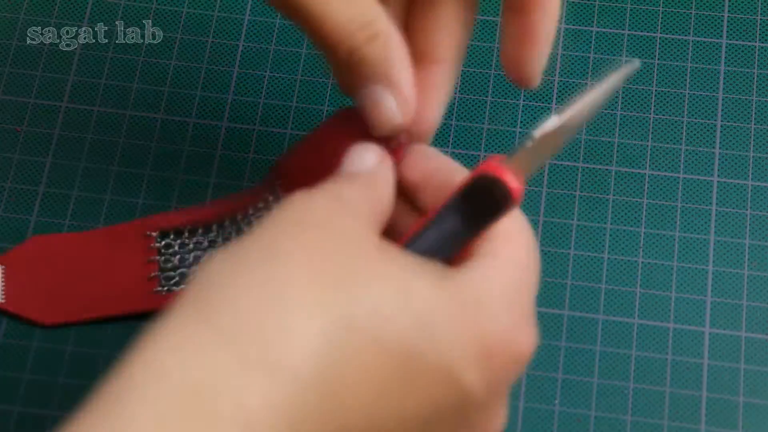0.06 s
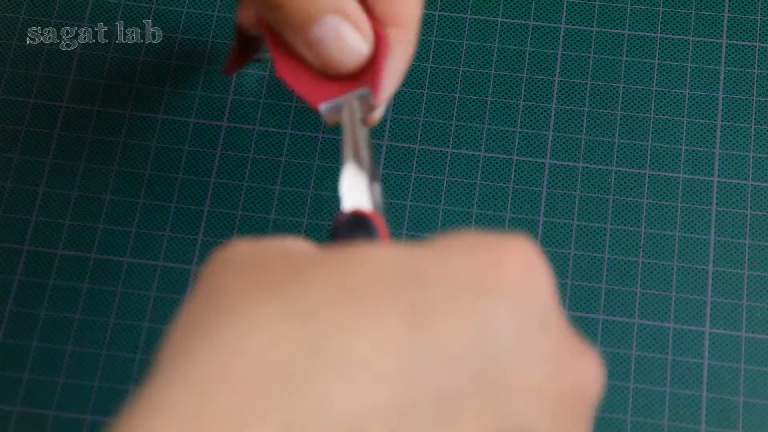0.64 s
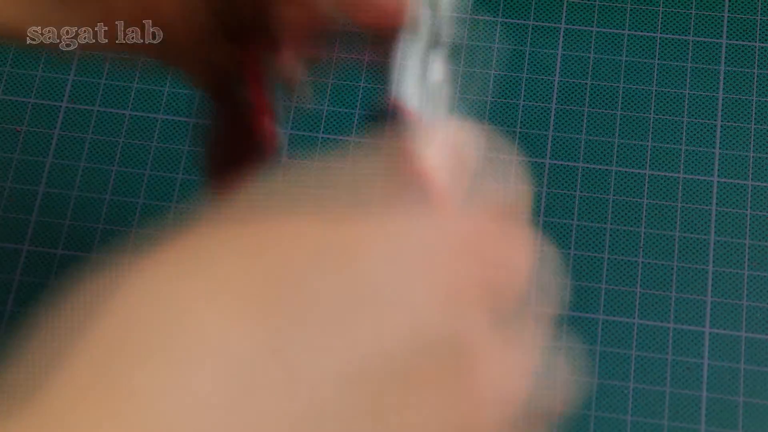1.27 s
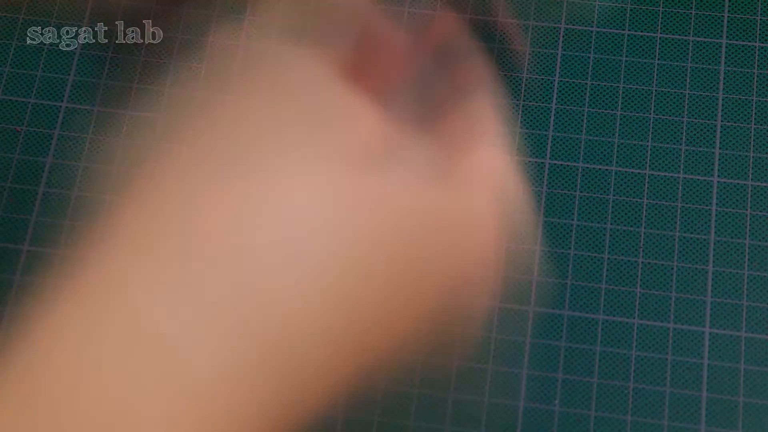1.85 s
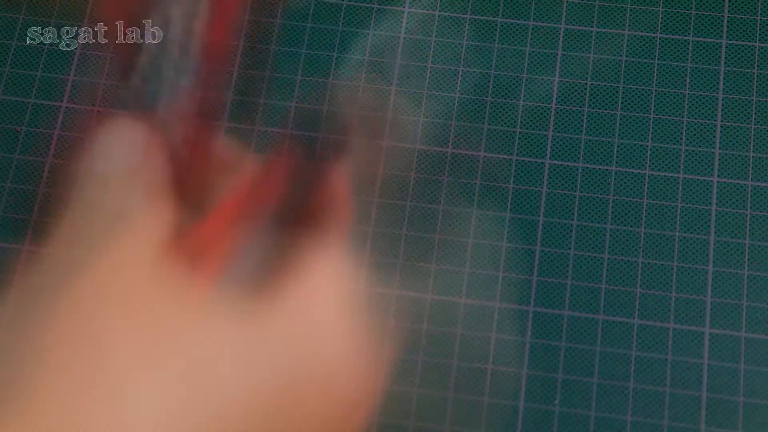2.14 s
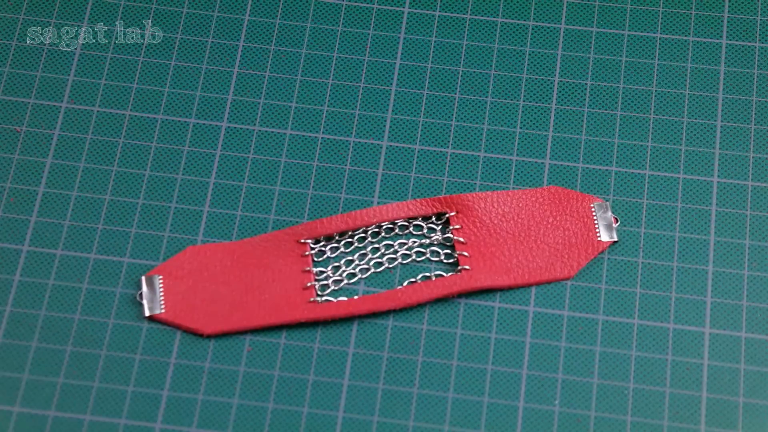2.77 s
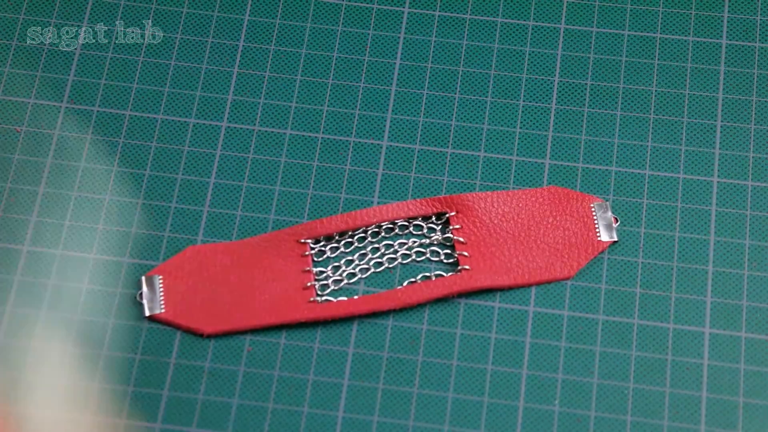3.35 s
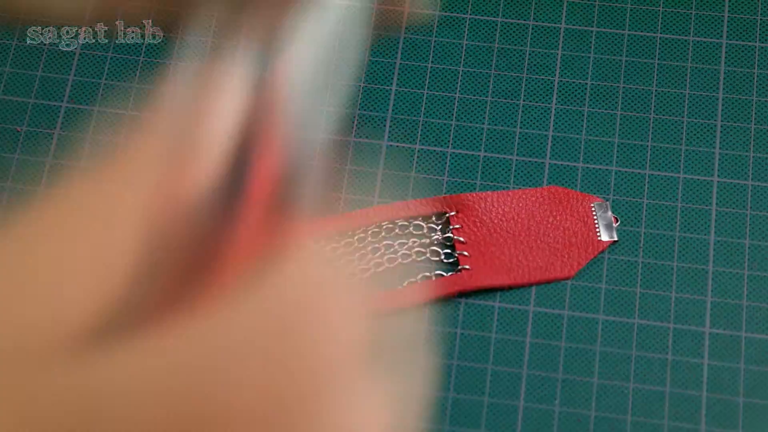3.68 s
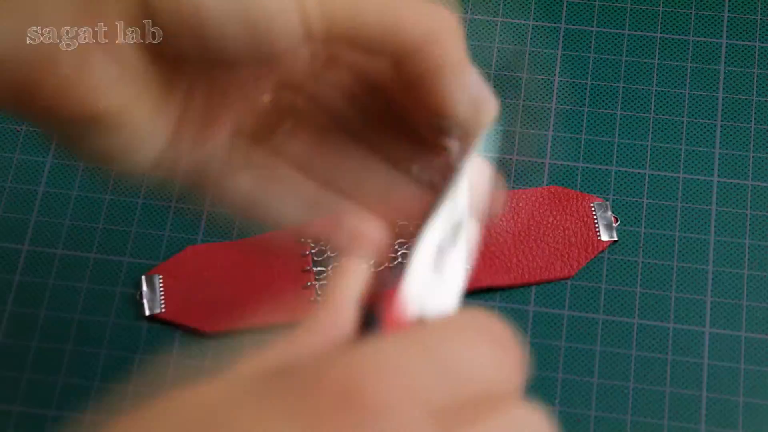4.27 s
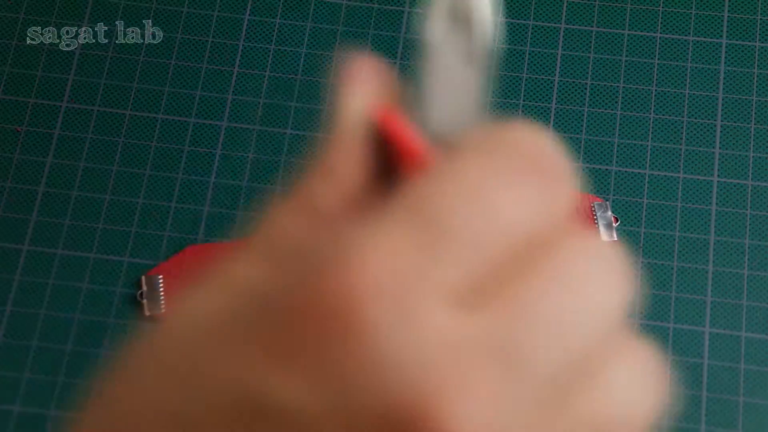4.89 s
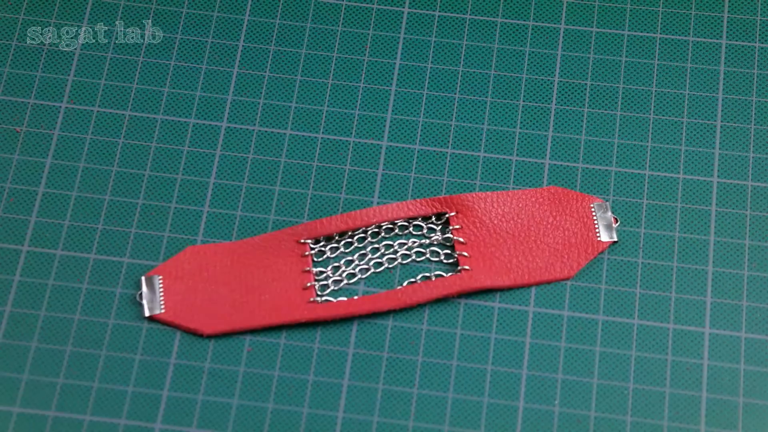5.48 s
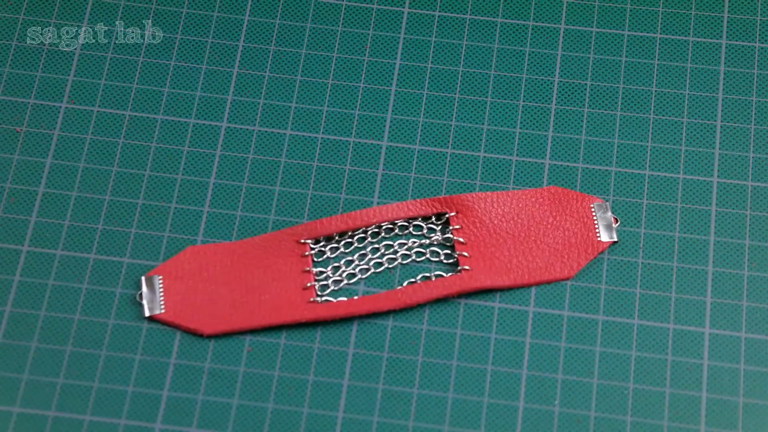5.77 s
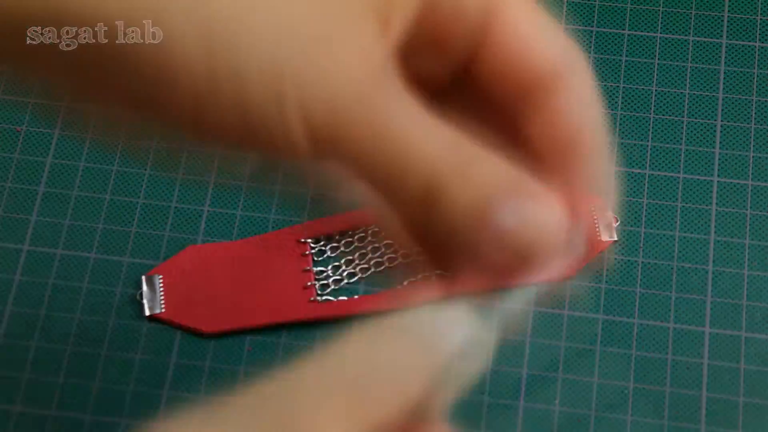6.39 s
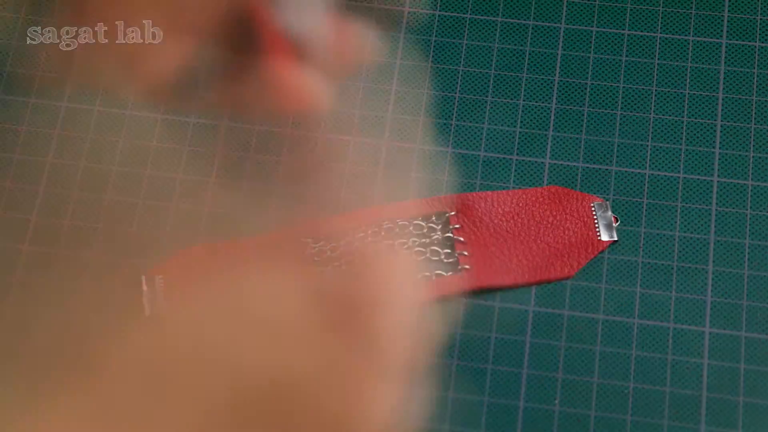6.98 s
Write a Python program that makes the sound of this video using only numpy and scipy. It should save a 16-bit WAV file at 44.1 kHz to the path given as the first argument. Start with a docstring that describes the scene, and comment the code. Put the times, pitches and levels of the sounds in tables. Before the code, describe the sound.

Close handling of a leather and chain bracelet: soft rubbing, a clasp clinking down, tiny squeaks and two sharp clicks of pliers.

```python
"""Bracelet work on a cutting mat

A leather and chain bracelet is handled up close in a small, dead room. Fingers and leather rub in
short, grainy strokes, a hand bumps the table, and a clasp drops on the mat with a brief ring.
Steel pliers squeak as they stick and slip, and twice snap shut.
Behind it all sit room air, a thin electrical whine and a faint wavering drone."""
import sys
import numpy as np
from scipy import signal
from scipy.fft import rfft, irfft, next_fast_len
from scipy.io import wavfile

SR = 44100
rng = np.random.default_rng(int(sys.argv[2]) if len(sys.argv) > 2 else 0)


def to_wav(s):
    """Save 16-bit WAV."""
    ch = np.atleast_2d(s).T  # columns
    pcm = np.round(np.clip(ch, -1, 1) * 32767)  # PCM
    wavfile.write(sys.argv[1], SR, pcm.astype(np.int16))


N = 310243

# how alike the two ears are: (frequency [Hz], correlation [0-1])
EAR_LIKENESS = [(40, .8), (280, .96), (550, .92), (2200, .97), (4500, .88), (10000, .8)]
# fixed resonances of the room and microphone body: (frequency [Hz], width [Hz], boost [dB])
ROOM_RESONANCES = [(309.6, 45, 15), (601, 40, 11), (1001, 50, 11), (1340, 43, 5), (1645, 87, 5.5),
                   (2398, 75, 10.5), (3203, 45, 11.5), (4890, 230, 3.5)]
# bounces off the nearest surfaces: (delay [s])
REFLECTION_DELAYS = [.0053, .0089, .0137, .0211]
# tone of the room air: (frequency [Hz], relative level [dB])
AIR_SPECTRUM = [(30, -20), (180, -28), (280, -15.5), (450, -14), (1300, -18.5), (3000, -24), (5500, -14.5),
                (7000, -24), (16000, -29.5)]
# partials of the electrical whine: (frequency [Hz], level [dB])
WHINE_PARTIALS = [(800, -85), (1600, -84), (2400, -82), (3200, -84)]
# stretches where the drone sounds: (start [s], end [s], level [dB])
DRONE_SPANS = [(2.786, 3.416, -76), (3.416, 3.72, -74.5), (4.847, 5.503, -69), (5.59, 6.1, -78),
               (6.501, 6.8, -70.5)]
# glide of the drone: (time [s], pitch [Hz])
DRONE_GLIDE = [(2.8, 237.3), (3.41, 240), (3.45, 305), (3.7, 275), (4.88, 292), (5.05, 250), (5.4, 224),
               (5.75, 248), (6.5, 250), (6.8, 335)]
# hands rustling between strokes: (time [s], relative level [dB])
RUSTLE_LEVELS = [(1.35, -72), (2.15, -68), (2.9, -62), (3.35, -63.5), (4.0, -75.5), (4.52, -59),
                 (4.82, -67), (5.22, -58), (5.68, -59), (5.83, -70.5), (6.4, -55), (6.9, -62.5)]
# a hand bumping the table: (time [s], length [s], pitch [Hz], wander [Hz], level [dB])
HAND_BUMPS = [(1.68, 0.028, 124, 18, -74), (2.33, .04, 114, 17, -74), (5.225, 0.04, 115, 24, -61.5),
              (6.22, .04, 110, 29, -69)]
# metal and leather squeaking: (time [s], length [s], pitch [Hz], wander [Hz], level [dB])
STICK_SLIPS = [(.104, 0.027, 1950, 630, -51.5), (.228, 0.032, 1746, 840, -45), (2.34, .05, 1019, 28, -56),
               (4.293, 0.069, 1018, 6.7, -45.5), (4.305, 0.062, 9140, 450, -45.5),
               (4.77, 0.026, 1830, 93, -65), (5.107, 0.056, 6020, 600, -48.5), (5.87, .11, 1814, 89, -61),
               (6.28, 0.1, 2155, 87, -54.5)]
# strokes of skin and leather: (time [s], length [s], relative level [dB], brightness [dB])
STROKES = [(-0.021, 0.033, -52.5, 3), (0.105, 0.031, -51.5, 1), (0.208, 0.064, -46, 1),
           (0.456, 0.052, -47, 6), (0.627, 0.05, -49.5, 0), (0.711, 0.055, -49, -1.5),
           (0.919, 0.083, -49.5, 3.5), (1.04, 0.042, -47.5, 2), (1.232, 0.033, -57, 5),
           (1.495, 0.049, -48.5, 1.5), (1.567, 0.067, -46.5, -0.5), (1.815, 0.062, -46.5, 0.5),
           (2.008, 0.031, -54.5, -3.5), (2.282, 0.14, -47, 6), (2.486, 0.082, -58, 2.5),
           (2.752, 0.075, -47.5, 0.5), (3.436, 0.044, -46, 3.5), (3.573, 0.038, -54.5, 3.5),
           (3.849, 0.08, -64.5, 2), (4.269, 0.13, -44, 4), (4.601, 0.035, -44, -4), (4.889, 0.076, -46, -2),
           (4.959, 0.074, -46, -1), (5.108, 0.085, -45, 0), (5.2, 0.061, -50, -0.5),
           (5.303, 0.055, -45.5, -0.5), (5.386, 0.044, -47, -3.5), (5.528, 0.094, -46.5, 1.5),
           (5.642, 0.11, -53, -0.5), (5.857, 0.12, -52, 1), (6.231, 0.2, -46.5, 1),
           (6.699, 0.046, -48, 2.5)]
# tone of rubbing, rustle and impact tails: (frequency [Hz], relative level [dB])
RUB_SPECTRUM = [(30, -21), (170, -23.5), (290, -8.5), (450, -6), (720, -7), (1200, -7.5), (2400, -9),
                (5000, -11), (7500, -15), (11400, -16.5), (16000, -21)]
# clasp and chain hitting mat and tool: (time [s], level [dB], brightness [dB])
CLASP_HITS = [(2.316, -49.5, 14.5), (2.357, -60.5, 21.5), (2.6871, -25, 1), (2.693, -27, 3),
              (2.7283, -41.5, -31), (2.772, -46, -26), (4.609, -45.5, -33)]
# ring of the clasp: (frequency [Hz], relative level [dB])
CLASP_MODES = [(2676, -46), (2923, -48), (4791, -44), (5529, -48), (6772, -56), (7305, -57), (8446, -51)]
# tone of a knock's noise burst: (frequency [Hz], relative level [dB])
KNOCK_SPECTRUM = [(250, -22), (1000, -3.5), (1800, -4), (2650, 13), (4000, -5), (4850, 11.5), (6700, -1.5),
                  (9300, 5), (16000, -2)]
# plier jaws meeting metal: (time [s], level [dB], body [dB], brightness [dB])
JAW_HITS = [(4.6673, -21.5, 3, -5), (6.2196, -23, -8, 1.5), (6.2292, -18, -8, 3)]
# ring of the steel pliers: (frequency [Hz], relative level [dB])
PLIER_MODES = [(2099, -47), (2326, -38), (3101, -42), (3790, -45), (4791, -39), (5410, -39), (5636, -42),
               (6142, -44), (6686, -47), (7757, -48), (8123, -43), (8436, -41), (8759, -45), (9679, -43),
               (9900, -43), (10309, -45), (10901, -51), (12177, -49)]
# tone of a snap's noise burst: (frequency [Hz], relative level [dB])
SNAP_SPECTRUM = [(250, -45.5), (800, -21.5), (1400, -9), (1900, -11), (2400, -4), (3900, -5), (5200, -3.5),
                 (8500, -8.5), (16000, -15.5)]

TAIL_T60_S = 0.24   # decay after strokes and impacts


def from_db(db):
    """Decibels to gain."""
    return 10 ** (np.asarray(db) / 20)


def rms_one(x):
    """Scale to an rms of 1."""
    return x / np.sqrt(np.mean(x ** 2) + 1e-20)


def at_hz(points, hz):
    """Read a curve on a log-frequency axis."""
    freqs, values = np.transpose(points)
    return np.interp(np.log(hz + 1), np.log(freqs), values)


def bins(size):
    """Frequencies of an FFT."""
    return np.arange(size // 2 + 1) * SR / size


def add(out, onset, sound):
    """Mix a sound in at an onset in seconds."""
    start = round(onset * SR)
    first, last = max(start, 0), min(start + sound.shape[-1], N)
    out[:, first:last] += sound[..., first - start:last - start]


def drift(rate, size):
    """A random wobble that heads for a new value `rate` times a second."""
    points = rng.standard_normal(int(size * rate / SR) + 2)
    return np.interp(np.arange(size) * rate / SR, np.arange(len(points)), points)


def decay(t60, size):
    """An envelope falling 60 dB in t60 seconds."""
    return np.exp(-np.log(1000) * np.arange(size) / SR / t60)


def stereo_noise(spectrum, size, grain_db=0):
    """Coloured noise with a narrow image; uneven micro-contacts make it grainy."""
    grains = from_db(grain_db * np.repeat(rng.standard_normal(size // 32 + 1), 32)[:size])
    mid, side = rfft(rng.standard_normal((2, size)) * grains)
    alike = np.clip(at_hz(EAR_LIKENESS, bins(size)), 0, 1)
    ears = np.sqrt(1 + alike) * mid + np.sqrt(1 - alike) * side * [[1], [-1]]
    return rms_one(irfft(spectrum * ears, size))


def room_noise(spectrum, size, grain_db=0):
    """Noise coloured by resonances of the room and microphone body, combed by near reflections."""
    hz = bins(size)
    peaks_db = sum(db / (1 + (2 * (hz - centre) / width) ** 2) for centre, width, db in ROOM_RESONANCES)
    reflections = sum(np.exp(-2j * np.pi * hz * delay) for delay in REFLECTION_DELAYS)
    comb = np.abs(1 + 0.33 * reflections)
    return stereo_noise(from_db(at_hz(spectrum, hz) + peaks_db) * comb, size, grain_db)


def contact_eq(body_db, bright_db, hz):
    """Soft, broad contacts add body; hard, small ones add brightness."""
    return from_db(at_hz([(600, body_db), (1500, 0), (3500, 0.0047), (9000, bright_db)], hz))


def room_bed(air_db, rustle_trim_db, flutter_db):
    """Still air, the rustle of moving hands, and an electrical whine that swells with the rustle."""
    t, size = np.arange(N) / SR, next_fast_len(N, True)
    air = from_db(air_db) * room_noise(AIR_SPECTRUM, size)[:, :N]
    motion_db = rustle_trim_db + np.interp(t, *np.transpose(RUSTLE_LEVELS)) + flutter_db * drift(25, N)
    rustle = from_db(motion_db) * room_noise(RUB_SPECTRUM, size)[:, :N]
    whine = sum(from_db(db - drift(21, N)) * np.sin(2 * np.pi * hz * t) for hz, db in WHINE_PARTIALS)
    whine_swell = from_db(0.45 * (motion_db - motion_db.mean()))
    return air + rustle + np.sqrt(2) * whine * whine_swell


def drone(waver_db=2.0, fade_s=0.057):
    """A faint low tone that comes, glides and goes, perhaps far traffic."""
    t = np.arange(N) / SR
    envelope = sum(from_db(db) * np.clip(np.minimum(t - start, end - t) / fade_s, 0, 1)
                   for start, end, db in DRONE_SPANS)
    pitch = np.interp(t, *np.transpose(DRONE_GLIDE))
    tone = np.sqrt(2) * np.sin(2 * np.pi * np.cumsum(pitch) / SR)
    return envelope * from_db(waver_db * drift(27, N)) * tone


def wavering_tones(events, wobbles_per_s, wet, room_t60, size=12000):
    """Each push sings one unsteady pitch, which the room smears and lets die."""
    out = np.zeros((2, N))
    for onset, length, centre_hz, wander_hz, db in events:
        pitch = centre_hz + wander_hz * drift(wobbles_per_s, size)
        push = np.sin(np.pi * np.clip(np.arange(size) / SR / length, 0, 1))
        tone = push * np.sin(2 * np.pi * np.cumsum(pitch) / SR)
        room = stereo_noise(1, size) * decay(room_t60, size)
        reverb = signal.fftconvolve(tone[None], room)[:, :size]
        blend = rms_one(rms_one(tone) + wet * rms_one(reverb))
        add(out, onset, from_db(db) * blend * np.sqrt(np.mean(push ** 2)))
    return out


def table_bumps():
    """A hand meets the table with a soft, low thud."""
    return wavering_tones(HAND_BUMPS, wobbles_per_s=130, wet=0.89, room_t60=0.26)


def chirp_run(count=24, start_s=5.37, end_s=5.70, length_s=0.024, low_hz=2300, high_hz=6500):
    """Cues for sticking metal: tiny squeaks at random pitches, unevenly spaced, building a little."""
    jitter, height = rng.random((count, 2)).T
    progress = (np.arange(count) + jitter) / count
    onsets = start_s + progress * (end_s - start_s)
    hz = low_hz * (high_hz / low_hz) ** height
    wander_hz = 0.04 * hz
    db = -62.5 + 3.5 * progress + 1.5 * rng.standard_normal(count)
    return np.column_stack([onsets, np.full(count, length_s), hz, wander_hz, db])


def squeaks():
    """Metal and leather stick and slip, singing with a fast, rough wobble."""
    return wavering_tones([*STICK_SLIPS, *chirp_run()], wobbles_per_s=900, wet=1.1, room_t60=0.12)


def swell(length, size):
    """Envelope of one smooth push and its dying tail."""
    power = np.sin(np.pi * np.clip(np.arange(size) / SR / length, 0, 1)) ** 2
    feedback = from_db(-120 / (TAIL_T60_S * SR))
    return np.sqrt(signal.lfilter([1 - feedback], [1, -feedback], power))


def rubbing(brush_lead_s=0.045, brush_db=-23.5, size=24000):
    """Each stroke of skin on leather is a crowd of tiny slips: a light brush around a firm push."""
    out = np.zeros((2, N))
    average_db = np.mean([db for _, _, db, _ in STROKES])
    for onset, length, db, bright_db in STROKES:
        body_db = 0.02 * (db - average_db)
        slips = room_noise(RUB_SPECTRUM, size, grain_db=1.5)
        slips = irfft(rfft(slips) * contact_eq(body_db, bright_db, bins(size)))
        push = np.pad(swell(length, size), (round(brush_lead_s * SR), 0))[:size]
        brush = from_db(brush_db) * swell(length + 2 * brush_lead_s, size)
        add(out, onset - brush_lead_s, from_db(db) * slips * np.hypot(push, brush))
    return out


def impacts(hits, modes, spectrum, crack_db, wash_db, wash_t60, ring_t60, tail_db, low_cut_hz,
            ring_db=-8, size=16384):
    """Struck metal: a crack, a dense wash of near reflections, ringing modes and a faint room tail."""
    out, t = np.zeros((2, N)), np.arange(size) / SR
    mode_hz, mode_db = np.transpose(modes)
    mode_t60 = ring_t60 * np.sqrt(mode_hz.min() / mode_hz)   # high modes die sooner
    height = from_db(mode_db) / np.sqrt(mode_t60)   # a short ring starts higher for the same energy
    envelope = from_db(crack_db) * decay(0.003, size) + from_db(wash_db) * decay(wash_t60, size)
    for onset, db, body_db, bright_db in hits:
        noise = room_noise(spectrum, size)
        burst = irfft(rfft(noise) * contact_eq(body_db, bright_db, bins(size))) * envelope
        tail = from_db(tail_db) * room_noise(RUB_SPECTRUM, size) * decay(TAIL_T60_S, size)
        # every blow lands elsewhere and so weights the modes anew
        scatter = from_db(rng.normal(0, 1, len(modes))) * rng.choice([-1, 1], len(modes))
        gains = height / height.max() * scatter * contact_eq(body_db, bright_db, mode_hz)
        ring = sum(gain * np.sin(2 * np.pi * hz * t) * decay(t60, size)
                   for gain, hz, t60 in zip(gains, mode_hz, mode_t60))
        add(out, onset, from_db(db) * (burst + tail + from_db(ring_db) * ring))
    # small parts radiate little bass
    return signal.sosfilt(signal.butter(4, low_cut_hz, "high", fs=SR, output="sos"), out + 1e-18)


def clasp_knocks():
    """Clasp and chain knock on mat and tool; the softer and duller the contact, the more body."""
    hits = [(onset, db, -8 - 0.29 * bright_db, bright_db) for onset, db, bright_db in CLASP_HITS]
    return impacts(hits, CLASP_MODES, KNOCK_SPECTRUM, crack_db=-37, wash_db=-0.5, wash_t60=0.071,
                   ring_t60=0.056, tail_db=-19, low_cut_hz=210)


def plier_snaps():
    """The jaws shut on metal with a hard crack and a short, steely ring."""
    return impacts(JAW_HITS, PLIER_MODES, SNAP_SPECTRUM, crack_db=-11, wash_db=0, wash_t60=0.087,
                   ring_t60=0.1, tail_db=-21, low_cut_hz=284)


def scene():
    """Metal up front, hands beneath it, the room behind; all a little left of centre."""
    metal = plier_snaps() + clasp_knocks()
    hands = squeaks() + table_bumps() + from_db(-2.5) * rubbing()
    room = room_bed(air_db=-76, rustle_trim_db=-2.5, flutter_db=1.26) + drone()
    return (metal + hands + room) * from_db([[1], [-1]])


def record(dry):
    """A steep low-pass takes off the top above 15.7 kHz."""
    return signal.sosfilt(signal.ellip(10, 0.2, 80, 15700, fs=SR, output="sos"), dry)


dry = scene()
out = record(dry)
to_wav(out)
```